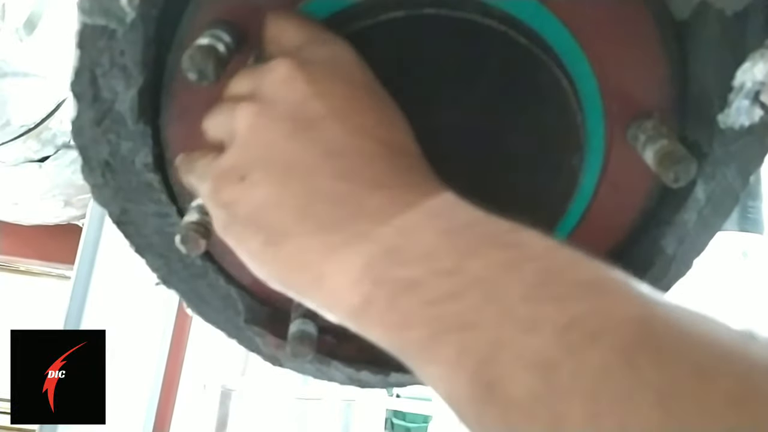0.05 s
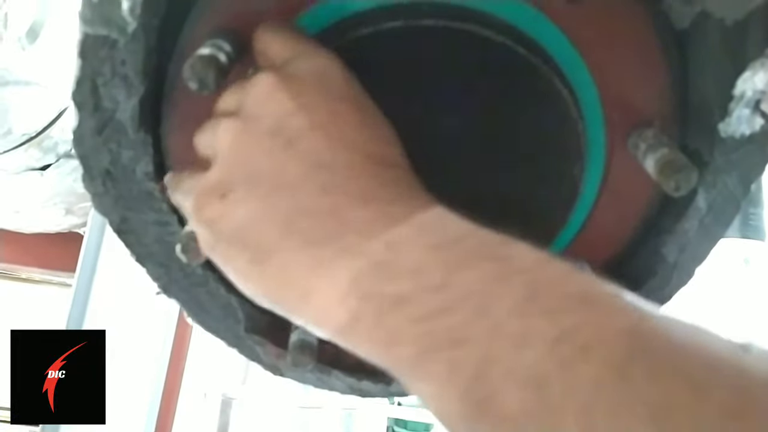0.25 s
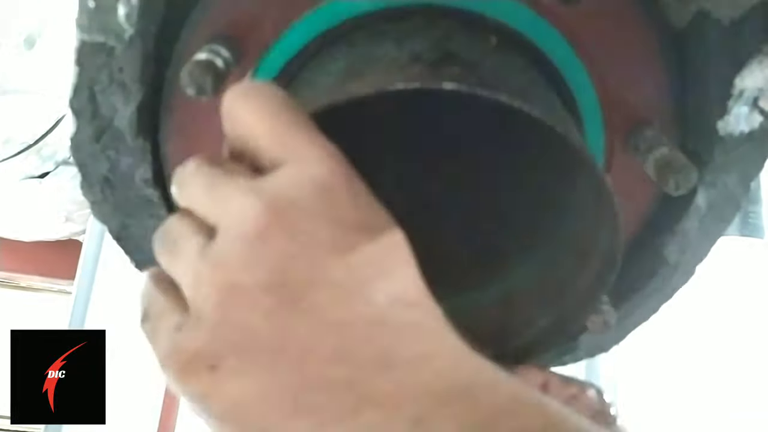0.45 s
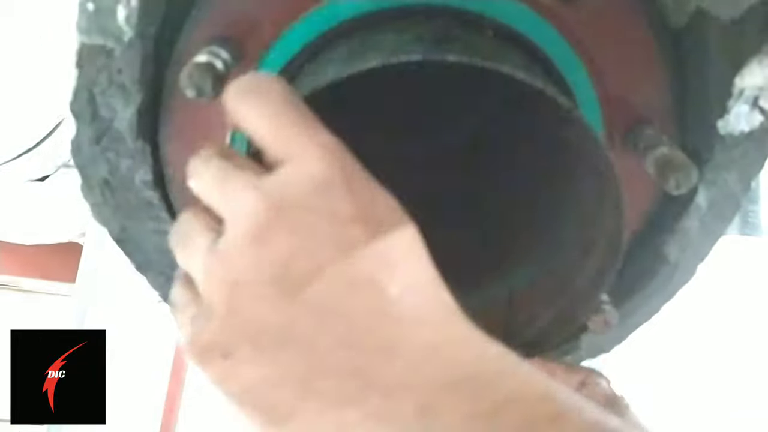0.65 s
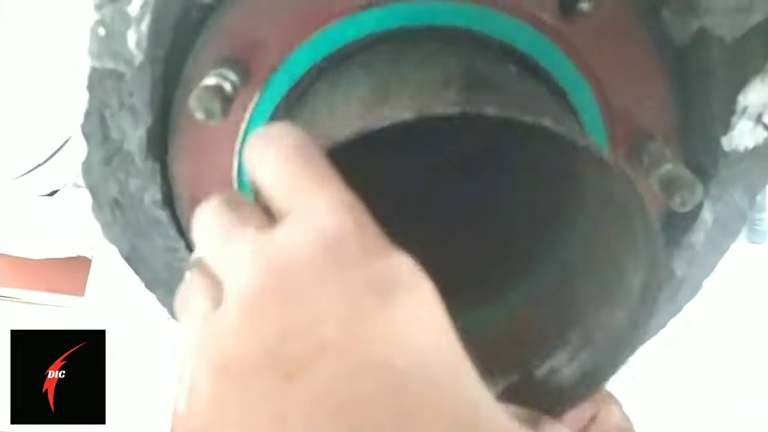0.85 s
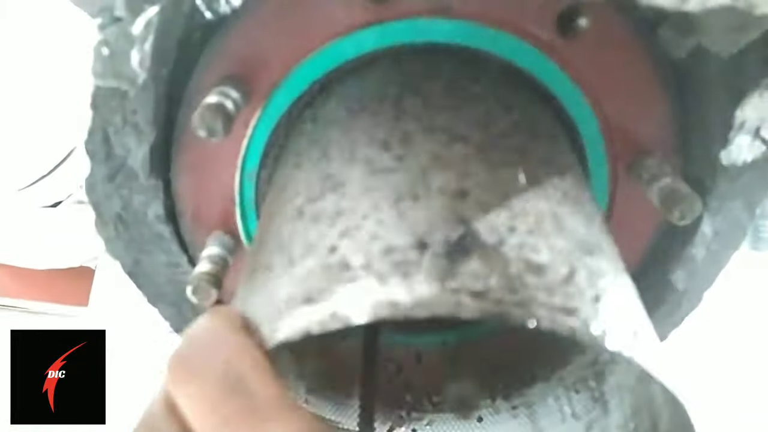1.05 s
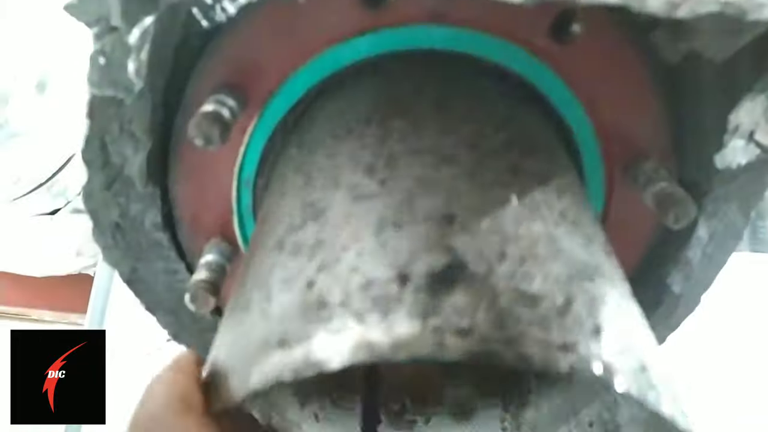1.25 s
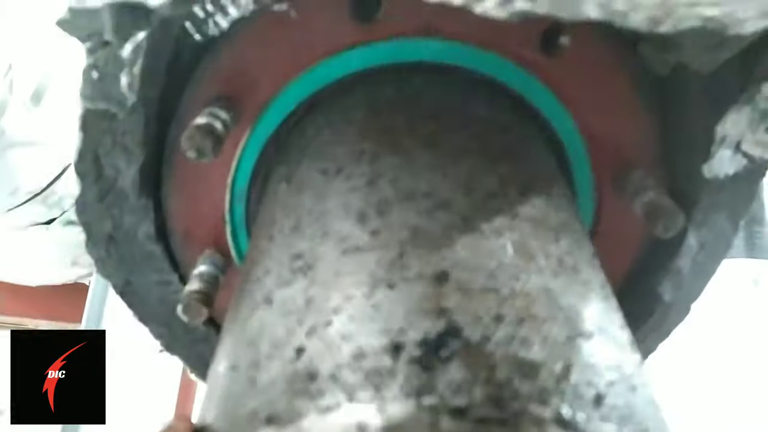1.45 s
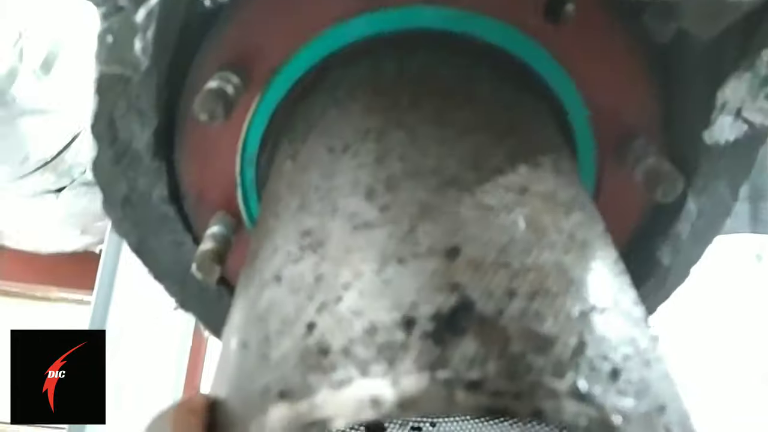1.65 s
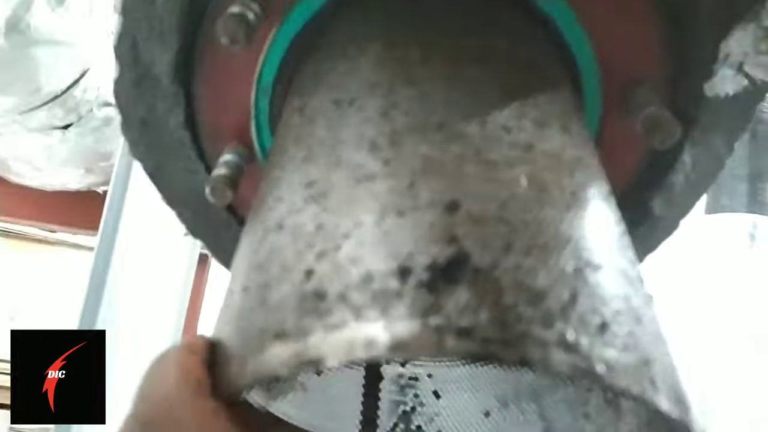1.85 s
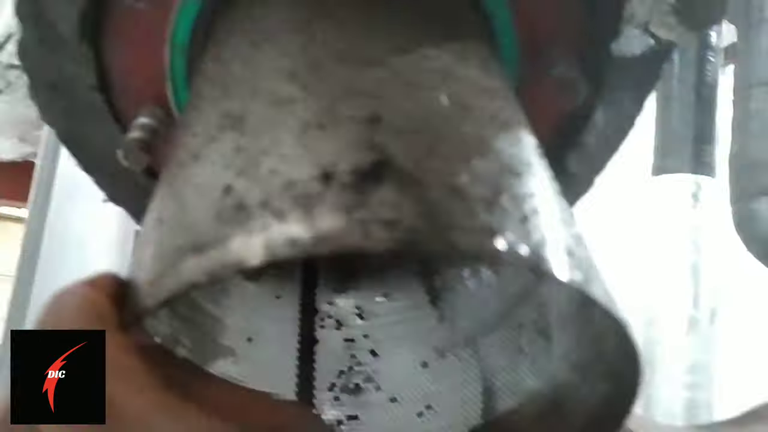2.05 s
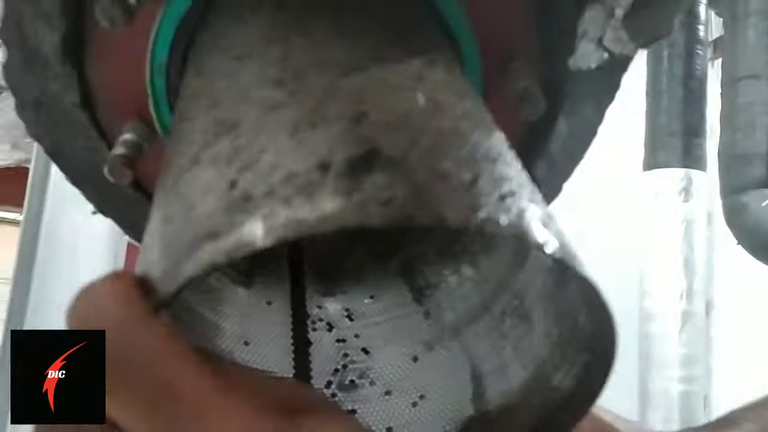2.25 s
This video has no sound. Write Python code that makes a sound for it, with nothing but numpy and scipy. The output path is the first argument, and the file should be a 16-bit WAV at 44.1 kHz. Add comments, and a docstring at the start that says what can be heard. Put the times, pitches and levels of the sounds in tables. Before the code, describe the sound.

A steel mesh strainer scrapes out of its pipe housing in several uneven pulls, with bright ticks as it snags. Its thin shell knocks against the pipe early on. Machinery hums steadily in the slightly echoing room.

```python
"""Pulling a steel strainer out of a pipe

A tube of steel mesh is dragged out of its pipe housing in several pulls. The mesh rasps over the rim
in tiny slips and snags now and then, and its thin shell knocks against the pipe.
The air in the pipe rings under the scraping, and machinery hums in the room."""
import sys
import numpy as np
from scipy import signal
from scipy.fft import rfft, irfft
from scipy.io import wavfile
from scipy.ndimage import map_coordinates

SR = 44100
rng = np.random.default_rng(int(sys.argv[2]) if len(sys.argv) > 2 else 0)


def unload_audio(sound):
    """Save the sound as a 16-bit wav file, at the path given as the first command line argument."""
    columns = np.transpose(np.atleast_2d(sound))
    # keep every value between -1 and 1, then stretch to whole-number steps
    steps = np.round(np.clip(columns, -1, 1) * 32767)
    wavfile.write(sys.argv[1], SR, steps.astype(np.int16))


N = 105840

# How loud each pull is over time. Each row: time in seconds, relative level in dB.
FIRST_SCUFF = [(0, -30.5), (.03, -45), (.043, -52), (.047, -32), (.059, -34), (.0606, -24), (.066, -26.5),
               (.085, -33), (.11, -44)]
BREAK_FREE = [(.186, -41), (.195, -18), (.205, -16), (.222, -18), (.2255, -11.5), (.252, -7.5), (.3, -12.5),
              (.332, -15.5), (.348, -29), (.4, -41), (.55, -51.5)]
RIM_GRIND = [(.295, -50), (.316, -22), (.335, -20.5), (.352, -27), (.38, -45)]
LONG_PULL = [(.6, -50), (.688, -36), (.693, -27.5), (.727, -27), (.752, -22.5), (.87, -19.5), (.9, -16.5),
             (.922, -23), (.965, -22), (1.03, -39.5)]
EASING = [(1.02, -37), (1.09, -36.5), (1.16, -32), (1.205, -37), (1.245, -33.5), (1.265, -27.5),
          (1.315, -37), (1.34, -46), (1.44, -52)]
FIRM_PULL = [(1.44, -47), (1.492, -31.5), (1.52, -31), (1.56, -22.5), (1.64, -20.5), (1.667, -18.5),
             (1.686, -15), (1.708, -34), (1.77, -50)]
CREEP = [(1.8, -56), (1.851, -42), (1.856, -37), (1.885, -40), (1.92, -36.5), (1.995, -35), (2.02, -53),
         (2.045, -46), (2.06, -34.5), (2.09, -45.5)]
TILT = [(2.105, -54), (2.135, -32), (2.14, -24.5), (2.155, -18), (2.159, -12.5), (2.168, -17), (2.183, -26),
        (2.22, -35.5), (2.26, -30), (2.285, -40)]
LAST_SLIDE = [(2.285, -43), (2.305, -31), (2.345, -24.5), (2.365, -32), (2.385, -29), (2.4, -51)]
# How alike the room sounds in both ears. Each row: frequency in Hz, likeness (1 is identical).
ROOM_LIKENESS = [(60, 0.96), (200, 0.92), (500, 0.79), (1200, 0), (2500, 0.0022), (8000, 0)]


def scrape():
    """Each pull rubs the mesh over the rim with a slight chatter; the shell boosts its own tones."""
    # Each row: a pull's loudness, its tone as (Hz, dB) points, left minus right in dB.
    pulls = [ (FIRST_SCUFF, [(500, -9), (800, -8.5), (1500, -8.5), (2100, -15.5), (3100, -8.5),
             (4800, -7.5), (6000, -8), (7500, -7.5), (8800, -1), (10300, -12), (15000, -28)], -2.5),
             (BREAK_FREE, [(250, -12), (500, -18), (800, -13.5), (1100, -11.5), (1400, -11.5), (1800, -8.5),
             (2300, -10), (2800, -2), (3500, -3.5), (4100, -3), (4800, -2.5), (6000, -5), (7400, -2.5),
             (8500, -1.5), (9500, 0), (11000, -7.5), (12500, -12), (15000, -18.5)], 0),
             (RIM_GRIND, [(450, -16.5), (720, -11), (1200, -25), (1650, -17.5), (1930, -4.5), (2300, -22.5),
             (3400, -9), (4000, -11.5), (15000, -50)], -1), (LONG_PULL, [(400, -13.5), (900, -14.5),
             (1250, -12.5), (1700, -17.5), (2400, -13.5), (2900, -6.5), (4300, -7), (4800, -8), (6000, -7),
             (8250, -1.5), (9700, -4.5), (10700, -8.5), (11200, -8.5), (12000, -12.5), (15000, -19)], -0.7),
             (EASING, [(500, -22), (1200, -13.5), (2200, -10.5), (3400, -3), (4200, -2), (4800, -1),
             (5500, -1.5), (9000, 1.5), (10300, -6), (15000, -16)], -0.6), (FIRM_PULL, [(400, -10.5),
             (800, -16.5), (1250, -16), (1450, -13), (2300, -15), (2850, -5.5), (3500, -7.5), (4300, -6),
             (4800, -3), (5300, -3.5), (6200, 0.5), (7200, -1.5), (8200, -0.5), (9800, -4.5),
             (12000, -11.5), (15000, -23)], 0), (CREEP, [(500, -21), (2200, -13.5), (3100, -1.5),
             (3600, -6), (4200, -16), (4900, -1), (5600, -7.5), (9000, 0), (10300, -9), (15000, -19)],
             -0.4), (TILT, [(500, -15), (2300, -15.5), (2900, -8), (3600, -10), (4100, -8), (5600, -6.5),
             (8200, 2.5), (10500, -6.5), (15000, -14)], 0.3), (LAST_SLIDE, [(500, -20), (2200, -13.5),
             (2900, -3), (4200, -1.5), (4800, -0.5), (5600, -4), (7600, -0.5), (9500, -3.5), (10500, -6),
             (15000, -12.5)], -1.5)]
    # The shell's tones. Each row: frequency in Hz, width in Hz, relative level in dB.
    shell_tones = [(2575, 12, -24), (2874, 8.3, 12.5), (2858, 20, -6.5), (3300, 58, -2.5), (3465, 78, 1),
                   (4660, 10.5, 0.5), (4650, 6.7, -9), (4830, 92, 2), (5490, 10, 12.5), (6170, 74, -3),
                   (6600, 51, 0), (7930, 17, -14), (8050, 51, 4), (8400, 81, 1.5), (8940, 34, 2),
                   (9450, 11, 5.5)]
    # Narrow dips and lifts from the pipe. Each row: frequency in Hz, width in Hz, gain in dB.
    pipe_bands = [(1750, 67, 1.5), (2375, 510, 1), (3000, 21, 1), (4230, 130, -4.5), (5210, 74, -3.5)]
    # Each row: frequency in Hz, likeness of left and right.
    likeness = [(400, 0.97), (950, 0.67), (1600, -0.36), (2100, 0.49), (2900, 0.39), (3700, 0.23),
                (5000, .15), (8000, 0.15), (15000, -0.19)]
    # Each row: frequency in Hz, left minus right in dB.
    balance = [(600, 1), (1100, 2.5), (1900, -1), (3500, 0.5), (6300, 1.7), (8200, -2.5), (10000, -1),
               (12000, .3)]
    rasp, f = np.zeros((2, N)), frequencies()
    for loudness, tone, pan_db in pulls:
        pull_db = np.interp(seconds(), *np.transpose(loudness), left=-np.inf, right=-np.inf)
        chatter_db = 1.75 * wobble(per_second=170)
        rasp += pan(pan_db) * filtered(wire_slips(amp(pull_db + chatter_db)), colour(tone))
    ringing = sum(amp(db) * 1j * f * width / (hz * hz - f * f + 1j * f * width)
                  for hz, width, db in shell_tones)
    shell = 1 + amp(-2) * ringing
    pipe = amp(sum(db * np.exp(-((f - hz) / width) ** 2) for hz, width, db in pipe_bands))
    side_db = along(balance, f) / 2
    return filtered(stereo(rasp, likeness), shell * pipe * amp([side_db, -side_db]))


def wire_slips(level, contacts=2, slips_per_second=7000, spread_db=5):
    """Wires slip at random where they touch the rim; each spot rings the mesh in its own way."""
    # The mesh's ringing. Each row: fade time in seconds, share of the energy in dB.
    mesh_fades = [(.006, -3.5), (.07, -3), (.25, -18)]
    t = seconds()[:SR // 2]
    fade = np.sqrt(sum((amp(db) * unit(decay(t, fade_s))) ** 2 for fade_s, db in mesh_fades))
    fade /= np.linalg.norm(fade)
    out = np.zeros((2, N))
    for _ in range(contacts):
        slips = (rng.random(N) < slips_per_second / contacts / SR) * np.sign(rng.standard_normal(N))
        slips = unit(slips * amp(spread_db * np.minimum(rng.standard_normal(N), 2)))
        ring = fade * rng.standard_normal((2, len(t)))
        out += signal.fftconvolve((slips * level)[None], ring, axes=1)[:, :N]
    return out / np.sqrt(contacts)


def snags():
    """A caught wire lets go with a bright tick and a short shimmer."""
    # Each row: start in seconds, level in dB, fade time in seconds, left minus right in dB,
    # tone slope below 8800 Hz in dB per octave.
    catches = [(0.0604, -15.5, 0.029, -7.5, 16), (0.2243, -4.5, 0.046, -1, 0),
               (.2475, -3.5, 0.011, -3.5, -4.5), (0.3148, -4, 0.018, 3, -2), (0.692, -28.5, .04, -4, -2),
               (0.863, -15, 0.0095, -5, 7), (.902, -6.5, 0.05, 1, -1.5), (1.533, -27, 0.022, -6, 1),
               (1.575, -18, 0.018, 2, 0.5), (1.647, -20, 0.021, 6, -3.5), (1.855, -29, 0.065, 0, -3.5),
               (1.989, -27, .03, -2, -3.5), (2.139, -19, 0.017, 6, 0.5), (2.1572, -23, 0.017, -7, 15),
               (2.178, -23, .008, 2, 5)]
    # Each row: frequency in Hz, relative level in dB.
    tick_tone = [(400, -24), (2000, -15), (3200, -6), (6000, -6), (8700, 2), (10500, -8), (15000, -15.5)]
    out, t = np.zeros((2, N)), seconds()[:SR // 3]
    for start, db, fade_s, pan_db, slope in catches:
        fade = decay(t, fade_s) + amp(-28) * decay(t, fade_s=0.12)
        tone = [(hz, level + slope * min(np.log2(hz / 8800), 0)) for hz, level in tick_tone]
        tick = filtered(fade * rng.standard_normal((2, len(t))), colour(tone))
        add(out, start, amp(db) * pan(pan_db) * tick)
    return out


def bumps():
    """The thin shell bumps softly against the pipe."""
    # Each row: start in seconds, level in dB.
    hits = [(.1225, -22.5), (.1295, -31.5), (2.239, -38.5)]
    # Each row: pitch in Hz, relative level in dB, fade time in seconds.
    tones = [(807, -6, 0.11), (932, -0.5, 0.044), (1010, -26, 0.017), (1430, -5, 0.17), (1473, -11.5, 0.13),
             (2900, -17, 0.13), (3671, -21, 0.25)]
    # Each row: frequency in Hz, relative level in dB.
    crack_tone = [(400, 3), (1000, 0), (2000, -6.5), (3200, -6), (6000, -10), (9000, 0.5), (11000, -24),
                  (15000, -38)]
    return strike(hits, tones, crack_tone, crack_db=-5, crack_s=0.12, tail_db=-13.5, tail_s=0.17)


def knock():
    """The shell hits the pipe hard and bounces."""
    # Each row: start in seconds, level in dB.
    hits = [(.567, -23.5), (.5703, -24.5), (.5793, -34), (.593, -44)]
    # Each row: pitch in Hz, relative level in dB, fade time in seconds.
    tones = [(442, -16, 0.012), (740, -1, 0.044), (1085, 2, 0.031), (1585, 6, 0.019), (2020, -5, 0.022),
             (2490, -7, 0.043), (3430, -4, 0.016), (4200, -5.5, 0.04), (4564, -1, 0.021)]
    # Each row: frequency in Hz, relative level in dB.
    crack_tone = [(250, 3.5), (1500, -3), (3000, -4), (4600, -3), (5600, -5), (9500, -5), (12000, -2),
                  (15000, -34)]
    return strike(hits, tones, crack_tone, crack_db=7, crack_s=0.03, tail_db=-24, tail_s=0.14)


def strike(hits, tones, crack_tone, crack_db, crack_s, tail_db, tail_s):
    """Each hit rings the metal and gives a noisy crack with a short tail."""
    ring, crack, t = np.zeros(N), np.zeros((2, N)), seconds()[:SR // 3]
    crack_fade = decay(t, crack_s) + amp(tail_db) * decay(t, tail_s)
    for start, hit_db in hits:
        for hz, db, fade_s in tones:
            level = amp(hit_db + db + rng.normal()) * decay(t, fade_s)
            add(ring, start, level * np.sin(2 * np.pi * (hz * t + rng.random())))
        add(crack, start, amp(hit_db + crack_db) * crack_fade * rng.standard_normal((2, len(t))))
    return ring + stereo(filtered(crack, colour(crack_tone)), ROOM_LIKENESS)


def pipe_air(edge_s=0.0073, waver=0.34):
    """The air in the pipe rings with a hollow, wavering note during the hard pulls."""
    # Each row: time in seconds, pitch in Hz.
    pitch = [(.25, 985), (.36, 975), (.68, 1085), (.715, 1075), (.735, 1000), (.85, 960), (1.65, 990)]
    # Each row: start in seconds, end in seconds, level in dB.
    notes = [(0.244, .335, -26), (0.691, 0.859, -40), (1.63, 1.7, -40)]
    t = seconds()
    phase = 2 * np.pi * np.cumsum(np.interp(t, *np.transpose(pitch))) / SR
    level = sum(amp(db) * np.clip((t - start) / edge_s, 0, 1) * np.exp(-np.maximum(t - end, 0) / edge_s)
                for start, end, db in notes)
    return level * (1 + waver * wobble(71.6)) * np.sin(phase + 2 * waver * wobble(60))


def shudder():
    """The housing gives a few dull thuds as the strainer breaks free."""
    # Each row: middle in seconds, pitch in Hz, level in dB, length in seconds.
    thuds = [(.235, 183, -25.5, 0.023), (.258, 221, -27, 0.032), (0.272, 61.6, -27, 0.088)]
    t = seconds()
    return sum(amp(db) * np.exp(-(2 * (t - mid) / length) ** 2) * np.sin(2 * np.pi * hz * (t - mid))
               for mid, hz, db, length in thuds)


def room_echo(sound):
    """The room's hard walls answer with a faint, darker tail."""
    # Each row: frequency in Hz, fade time in seconds.
    fade_times = [(200, 0.52), (1500, 0.85), (4000, 0.84), (8000, 1.25), (14000, 0.67)]
    # Each row: frequency in Hz, echo level in dB.
    echo_levels = [(200, -16), (900, -15.5), (1700, -11), (3000, -16), (8000, -23), (11000, -24)]
    hz, t, bands = signal.stft(rng.standard_normal((2, SR)), SR, nperseg=256)
    build_up = np.exp(-(0.0062 / (t + 0.004)) ** 2)
    bands = bands * decay(t, along(fade_times, hz)[:, None]) * build_up
    tail = signal.istft(bands, SR, nperseg=256)[1]
    echo = signal.fftconvolve(sound, tail / np.linalg.norm(tail[0]), axes=1)[:, :N]
    return filtered(echo, amp(along(echo_levels, frequencies())))


def machinery():
    """Machines give a steady rumble and a slightly unsteady hum."""
    # Each row: frequency in Hz, relative level in dB.
    rumble_tone = [(25, -33), (40, -13), (60, 2.5), (80, -1.5), (120, -0.5), (180, -4), (290, -0.5),
                   (400, -9), (600, -15), (1000, -22), (1600, -23), (2500, -27.5), (8000, -35.5),
                   (15000, -37)]
    # Each row: pitch in Hz, level in dB.
    hum_notes = [(86.2, -41), (99.5, -48.5), (172.4, -47), (315, -51), (374, -57), (412, -61)]
    rumble = stereo(filtered(rng.standard_normal((2, N)), colour(rumble_tone)), ROOM_LIKENESS)
    hum = np.zeros(N)
    for hz, db in hum_notes:
        level = np.sqrt(2) * amp(db + 2.4 * wobble(4.44))
        hum += level * np.sin(2 * np.pi * (hz * seconds() + rng.random()) + 0.16 * wobble(2.97))
    return amp(-37) * rumble + hum


def amp(db):
    """Turn decibels into a multiplier."""
    return 10 ** (np.asarray(db) / 20)


def unit(x):
    """Scale to an average power of 1."""
    return x / np.sqrt(np.mean(x ** 2) + 1e-20)


def along(points, hz):
    """Read between (Hz, value) points, spaced by octaves."""
    f, values = np.transpose(points)
    return np.interp(np.log(hz + 1), np.log(f + 1), values)


def seconds():
    """The time of each sample."""
    return np.arange(N) / SR


def wobble(per_second):
    """A smooth curve through random values."""
    values = rng.standard_normal(int(N * per_second / SR) + 4)
    return map_coordinates(values, [seconds() * per_second])


def decay(t, fade_s):
    """Die away by 60 dB over the fade time."""
    return np.exp(-np.log(1000) * t / fade_s)


def pan(db):
    """Left and right gains, db apart."""
    return amp(np.array([[db], [-db]]) / 2)


def frequencies():
    """The frequencies in Hz that filters work on."""
    return np.fft.rfftfreq(2 * N, 1 / SR)


def filtered(sound, gains):
    """Give each frequency its own gain."""
    return irfft(rfft(sound, 2 * N) * gains, 2 * N)[..., :N]


def colour(points):
    """A filter shaped by (Hz, dB) points, falling away below the first."""
    f = frequencies()
    gain = amp(along(points, f)) * np.minimum(f / points[0][0] + 1e-3, 1) ** 2
    # These steps keep the filter from ringing before the sound starts.
    cepstrum = irfft(np.log(unit(gain)))
    cepstrum[1:N] *= 2
    cepstrum[N + 1:] = 0
    return np.exp(rfft(cepstrum))


def stereo(pair, likeness):
    """Blend two unrelated sounds into left and right with the given likeness."""
    angle = np.arccos(np.clip(along(likeness, frequencies()), -1, 1)) / 2
    mid, side = filtered(pair, np.array([np.cos(angle), np.sin(angle)]))
    return np.array([mid + side, mid - side])


def add(track, start_s, sound):
    """Mix a sound in at the given time."""
    start = max(round(start_s * SR), 0)
    track[..., start:start + sound.shape[-1]] += sound[..., :N - start]


def scene():
    """The strainer, its echo and the machinery behind it."""
    hits = bumps() + knock()
    strainer = amp(-0.86) * scrape() + snags() + pipe_air() + hits + shudder()
    return strainer + room_echo(strainer) + machinery()


def record(dry):
    """Round off the loudest peaks and cut the highest treble."""
    ceiling, top_hz = 0.92, 15400
    rounded = dry / (1 + np.abs(dry / ceiling) ** 6) ** (1 / 6)
    return filtered(rounded, frequencies() < top_hz)


dry = scene()
out = record(dry)
unload_audio(out)
```